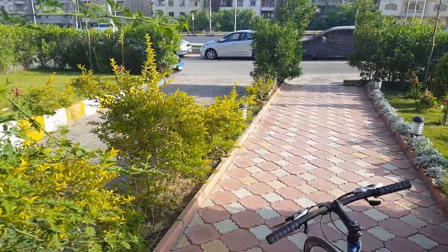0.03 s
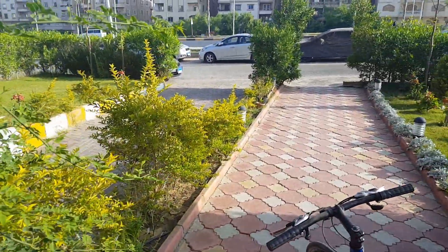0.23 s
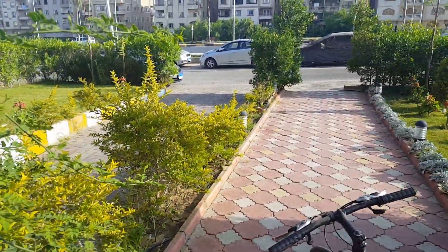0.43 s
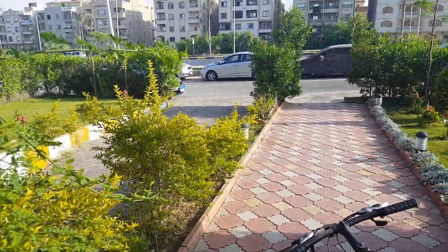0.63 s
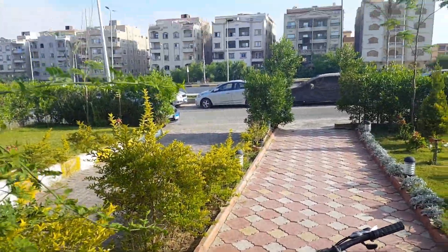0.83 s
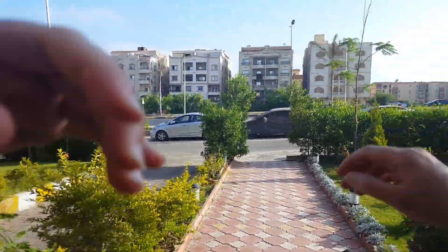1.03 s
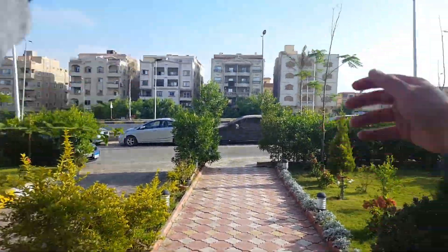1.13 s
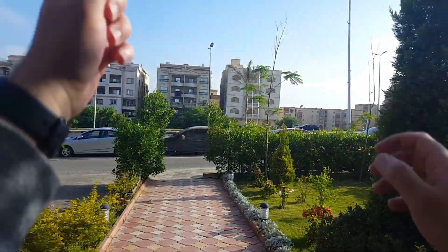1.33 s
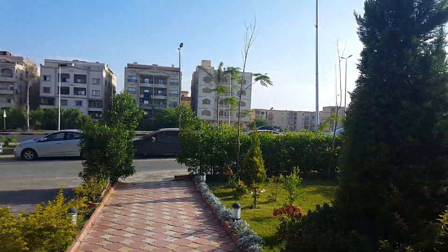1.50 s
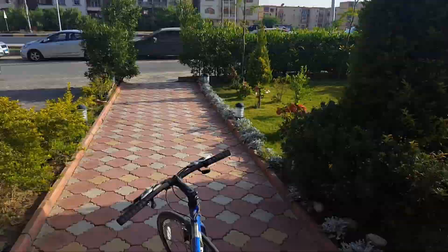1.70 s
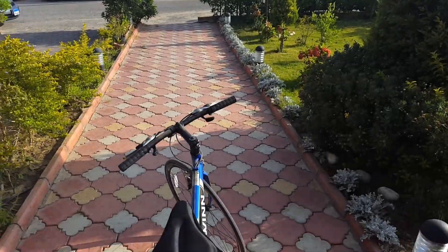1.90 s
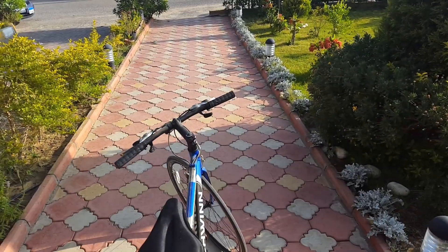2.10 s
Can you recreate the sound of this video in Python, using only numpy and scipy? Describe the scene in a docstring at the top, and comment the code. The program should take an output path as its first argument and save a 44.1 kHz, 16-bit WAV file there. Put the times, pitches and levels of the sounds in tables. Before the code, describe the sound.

A steel gate bangs against its frame close by, its bars ringing and its panels booming. Small metal clinks, two echoing steps on stone and faint rustling cloth come next, while traffic rumbles far away.

```python
"""A heavy steel gate slams in an echoing stone entrance, over distant traffic.
The latch touches at 0.17 s; the leaf hits the frame twice and rattles, ringing its bars.
Its panels boom at the slam and the rebound. From 0.5 s, loose metal parts clink.
Two footsteps follow near 0.85 and 1.25 s, heel then sole, with clothing rustle and low echoes.
A soft swish rises at 1.8 s."""
import sys
import numpy as np
from scipy import signal
from scipy.fft import rfft, irfft
from scipy.io import wavfile

SR = 44100
rng = np.random.default_rng(int(sys.argv[2]) if len(sys.argv) > 2 else 0)


def master(y):
    """Save y as 16-bit WAV."""
    cut = np.clip(np.atleast_2d(y).T, -1, 1)
    pcm = np.round(cut * 32767)  # scale
    wavfile.write(sys.argv[1], SR, pcm.astype(np.int16))


N = 94815
TIME_S = np.arange(N) / SR

# left-right likeness of noise: freq_hz, coherence
COHERENCE = [(170, 0.97), (350, 0.86), (700, 0.02)]
# distant traffic: freq_hz, density_db
TRAFFIC_SPECTRUM = [(22, -51), (49, -0.5), (427, -16), (1050, -14), (16000, -62)]
# gate on latch and frame: start_s, clash_db, clang_db, pan_db, tilt_db_per_octave, bar_hz
GATE_BLOWS = [(0.169, -31.5, -36, 2.5, 1, 950), (0.234, -20, -17, 7, 3, 892),
              (0.264, -19, -18.5, 2, -2.5, 888), (0.2926, -17, -23.5, 0, 1.5, 790),
              (0.4086, -27, -37, -1, -1, 1027), (0.4446, -30, -31.5, 1, 0.5, 877),
              (0.503, -27.5, -26, -4, -4, 732), (0.5289, -25, -27.5, 3, -2.5, 954),
              (0.7411, -41.5, -36, -7, -6, 950)]
# steel on steel: freq_hz, density_db
CLASH_SPECTRUM = [(100, -77), (700, 11), (2000, 8.5), (4000, 3), (5200, 1), (7000, -3), (9200, -9),
                  (10500, -18.5), (15500, -23)]
# frame resonances: freq_hz, half_width_hz, boost_db
FRAME_MODES = [(2050, 37, 4), (3050, 68, 5), (3890, 33, 7.5), (4160, 70, 7), (6900, 140, 5)]
# clang of the bars: freq_hz, density_db
CLANG_SPECTRUM = [(60, -41), (250, 3.5), (600, 1.5), (1300, -12), (2500, -10.5), (12000, -58)]
# entrance reverberation: freq_hz, t60_s
ENTRANCE_DECAY = [(400, 2.66), (1000, 0.46), (5000, 0.89), (15000, 0.73)]
# stone returns less top treble: freq_hz, density_db
ENTRANCE_SPECTRUM = [(3500, 5.5), (8000, 2), (11000, 4.5)]
# panel booms, slam then rebound: start_s, peak_s, noise_db
BOOM_EVENTS = [(0.183, 0.354, -14), (0.489, 0.52, -26)]
# boom noise: freq_hz, density_db, t60_s
BOOM_BANDS = [(25, -24, 1), (60, -8.5, 1.43), (125, -3.5, 6.06), (240, -4.5, 2.4), (339, -4, 1.47),
              (780, -15.5, 0.96), (1980, -29, 1.1), (5900, -66.5, 0.92)]
# panel modes: pitch_hz, slam_db, rebound_db, t60_s
PANEL_MODES = [(136.5, -21, -30, 1.15), (170, -21, -20, 0.97), (213, -18.5, -39, 0.75),
               (296, -23, -35, 1.5), (484, -25, -36.5, 1.3), (629, -25.5, -58, 1.2)]
# loose metal: start_s, level_db, pitch_hz, half_width_hz
CLINK_EVENTS = [(0.529, -30.5, 6550, 347), (0.691, -50, 7900, 3020), (0.923, -41.5, 7000, 150),
                (0.98, -34.5, 4430, 200), (1.004, -43, 7800, 404), (1.025, -41, 5730, 50),
                (1.16, -37.5, 12100, 4900), (1.584, -50, 5795, 220)]
# heel and sole contacts: start_s, tap_db, thud_db, attack_s, knock_hz, knock_db
FOOTFALLS = [(0.838, -27, -29, 0.0018, 855, -36.5), (0.887, -31, -22.5, 0.014, 767, -28),
             (0.94, -59, -28.5, 0.011, 456, -28.5), (1.242, -31, -30.5, 0.0038, 939, -38),
             (1.275, -52, -36.5, 0.0034, 311.5, -32), (1.316, -37, -24.5, 0.017, 828.3, -29),
             (1.4144, -43.5, -29, 0.0066, 857, -42), (1.584, -40.5, -39.5, 0.002, 1000, -43)]
# grit tap and sole thud: freq_hz, tap_density_db, thud_density_db
SHOE_SPECTRA = [(59.3, -16, -13), (307, 9, 8.5), (780, 13, 4.5), (1690, 4.5, -2), (5500, 4.5, -25),
                (10330, -20, -69), (16000, -24, -60)]
# footfall knock: pitch_ratio, level_db
KNOCK_MODES = [(1, 0), (1.57, -7), (1.95, -5), (2.07, -7)]
# clothing rustle, also the clinks' base noise: freq_hz, density_db
RUSTLE_SPECTRUM = [(500, -5), (2000, 6.5), (9000, -5.5), (10500, -20), (13000, -11)]
# rustle before grain: time_s, level_db
RUSTLE_ENVELOPE = [(0.85, -93), (0.98, -36.5), (1.07, -58.5), (1.15, -49.5), (1.3, -57), (1.52, -54.5),
                   (1.68, -72)]
# low echo of each step: start_s, level_db
RUMBLE_EVENTS = [(0.9, -24.5), (1.33, -31)]
# step echo noise: freq_hz, density_db, t60_s
RUMBLE_BANDS = [(30, -7.5, 2.3), (110, 5, 6), (221, 0.5, 2.5), (458, 0.5, 0.84), (1530, -63, 0.82)]
# soft swish: freq_hz, density_db
SWISH_SPECTRUM = [(300, -14), (900, 4.5), (1400, -5.5), (2300, 1), (5300, -6.5), (8800, -23), (10500, -62)]
# swish swell: time_s, level_db
SWISH_ENVELOPE = [(1.8, -61), (1.85, -43.5), (1.99, -39.5), (2.15, -44)]


def amp(db):
    """Decibels to gain."""
    return 10 ** (np.asarray(db) / 20)


def lookup(table, hz, column=1):
    """Table column interpolated over log frequency."""
    columns = np.transpose(table)
    return np.interp(np.log(hz + 1), np.log(columns[0] + 1), columns[column])


def envelope(points):
    """Gain along (time_s, level_db) points; silent before the first."""
    return amp(np.interp(TIME_S, *np.transpose(points))) * (TIME_S > points[0][0])


def add(mix, start_s, sound, pan_db=0):
    """Mix in a stereo sound; positive pan is left."""
    part = mix[:, round(start_s * SR):][:, :sound.shape[1]]
    part += sound[:, :part.shape[1]] * amp([[pan_db / 2], [-pan_db / 2]])


def noise(spectrum, size=N, column=1, bin_gain=1):
    """Unit-RMS stereo noise, nearly mono in the bass."""
    hz = np.fft.rfftfreq(size, 1 / SR)
    coherence = lookup(COHERENCE, hz)
    mid, side = rfft(rng.standard_normal((2, size))) * np.sqrt([1 + coherence, 1 - coherence])
    shape = amp(lookup(spectrum, hz, column)) * bin_gain
    x = irfft(np.array([mid + side, mid - side]) * shape, size)
    return x / np.sqrt(np.mean(x ** 2))


def struck(x, attack_s, t60_s, hold_s=0):
    """Linear attack, hold, exponential decay."""
    t = TIME_S[:x.shape[1]]
    return x * np.minimum(t / attack_s, 1) * amp(-60 * np.maximum(t - attack_s - hold_s, 0) / t60_s)


def band_decay(x, table, start_s=0, column=1):
    """Decay each frequency at its own T60."""
    hz, t, bands = signal.stft(x, SR, nperseg=512)
    decay = amp(-60 * np.maximum(t - start_s, 0) / lookup(table, hz, column)[:, None])
    return signal.istft(bands * decay, SR)[1][:, :x.shape[1]]


def ring(hz, size, attack_s, t60_s):
    """One damped mode, slightly out of phase between channels."""
    phase_turns = rng.random() + rng.standard_normal((2, 1)) * 0.13
    return struck(np.sin(2 * np.pi * (hz * TIME_S[:size] + phase_turns)), attack_s, t60_s)


def traffic():
    """Steady low rumble of distant traffic."""
    return amp(-39.5) * noise(TRAFFIC_SPECTRUM)


def gate_blows(size=32768, spacing_hz=44.02, ripple_db=2.4, clang_attack_s=0.0045):
    """Each blow rings the same steel: bright clash with frame modes, lower clang, one bar."""
    out, hz = np.zeros((2, N)), np.fft.rfftfreq(size, 1 / SR)
    # crowded random resonances
    steel = amp(ripple_db * np.interp(hz / spacing_hz, np.arange(size), rng.standard_normal(size)))
    frame_db = sum(db / (1 + ((hz - mode_hz) / half_width_hz) ** 2)
                   for mode_hz, half_width_hz, db in FRAME_MODES)
    octaves = np.log2(hz + 1)
    for start_s, clash_db, clang_db, pan_db, tilt_db_per_octave, bar_hz in GATE_BLOWS:
        clash = noise(CLASH_SPECTRUM, size, bin_gain=steel * amp(tilt_db_per_octave * octaves + frame_db))
        clash = struck(clash, attack_s=0.00059, t60_s=0.14, hold_s=0.0016)
        clang = struck(noise(CLANG_SPECTRUM, size, bin_gain=steel), clang_attack_s, t60_s=0.29)
        bar = amp(-5.5) * ring(bar_hz, size, clang_attack_s, t60_s=0.33)
        add(out, start_s, amp(clash_db) * clash, pan_db)
        add(out, start_s, amp(clang_db) * (clang + bar))
    return out


def entrance_echo(x, rise_s=0.02):
    """Diffuse echo off stone, longest in the bass."""
    tail = band_decay(noise(ENTRANCE_SPECTRUM), ENTRANCE_DECAY) * np.minimum(TIME_S / rise_s, 1)
    return signal.fftconvolve(x, tail / np.linalg.norm(tail[0]), axes=1)[:, :N]


def panel_boom():
    """Panels and entrance air build up, then ring out; the rebound favours the lower modes."""
    out = np.zeros((2, N))
    for event, (start_s, peak_s, noise_db) in enumerate(BOOM_EVENTS):
        swell = np.clip((TIME_S - start_s) / (peak_s - start_s), 0, 1) ** 0.71
        since_peak_s = np.maximum(TIME_S - peak_s, 0)
        boom = amp(noise_db) * band_decay(noise(BOOM_BANDS), BOOM_BANDS, peak_s, column=2)
        for hz, slam_db, rebound_db, t60_s in PANEL_MODES:
            mode_db = (slam_db, rebound_db)[event] - 60 * since_peak_s / t60_s
            phase_turns = rng.random() + rng.standard_normal((2, 1)) * hz / 4000
            boom += amp(mode_db) * np.sin(2 * np.pi * (hz * TIME_S + phase_turns))
        out += swell * boom
    return out


def clinks(size=4096):
    """Loose metal parts tick or ring briefly, to the left."""
    out, hz = np.zeros((2, N)), np.fft.rfftfreq(size, 1 / SR)
    for start_s, level_db, pitch_hz, half_width_hz in CLINK_EVENTS:
        resonance = 1 / (1 + ((hz - pitch_hz) / half_width_hz) ** 2)
        clink = struck(noise(RUSTLE_SPECTRUM, size, bin_gain=resonance), attack_s=0.0012, t60_s=0.047)
        add(out, start_s, amp(level_db) * clink, pan_db=3)
    return out


def footsteps(size=16384):
    """The heel taps gritty stone; the sole lands with a ringing knock."""
    out = np.zeros((2, N))
    for start_s, tap_db, thud_db, attack_s, knock_hz, knock_db in FOOTFALLS:
        tap = amp(tap_db) * struck(noise(SHOE_SPECTRA, size), attack_s, t60_s=0.099)
        thud = amp(thud_db) * struck(noise(SHOE_SPECTRA, size, column=2), attack_s, t60_s=0.26)
        knock = sum(amp(knock_db + db) * ring(knock_hz * ratio, size, attack_s, t60_s=0.13)
                    for ratio, db in KNOCK_MODES)
        add(out, start_s, tap + thud + knock, pan_db=-0.5)
    return from_right(out)


def from_right(x, lag_s=0.000377):
    """The direct share of the sound reaches the left channel later."""
    hz = np.fft.rfftfreq(N, 1 / SR)
    left, right = rfft(x)
    direct = 0.35 * (1 - lookup(COHERENCE, hz))
    delayed = right * np.exp(-2j * np.pi * hz * lag_s)
    left = np.sqrt(1 - direct ** 2) * left + direct * delayed
    return irfft(np.array([left, right]), N)


def clothing_rustle(grain_db=3.56):
    """Cloth noise with a fast random flutter in level."""
    knots_s = TIME_S[::128]
    grain = amp(grain_db * np.interp(TIME_S, knots_s, rng.standard_normal(len(knots_s))))
    return envelope(RUSTLE_ENVELOPE) * grain * noise(RUSTLE_SPECTRUM)


def step_echoes(rise_s=0.067):
    """The entrance answers each step with a hollow rumble that darkens as it fades."""
    out = np.zeros((2, N))
    for start_s, level_db in RUMBLE_EVENTS:
        rumble = band_decay(noise(RUMBLE_BANDS), RUMBLE_BANDS, rise_s, column=2)
        add(out, start_s, amp(level_db) * np.minimum(TIME_S / rise_s, 1) * rumble)
    return out


def swish():
    """Soft swell of midrange noise."""
    return envelope(SWISH_ENVELOPE) * noise(SWISH_SPECTRUM)


def scene():
    """Sum of all layers; blows and steps feed the entrance echo."""
    gate, steps = gate_blows(), footsteps()
    echo = entrance_echo(amp(-11) * gate + amp(-8) * steps)
    foreground = gate + echo + clinks() + panel_boom() + steps + step_echoes()
    return foreground + traffic() + clothing_rustle() + swish()


def record(dry, cutoff_hz=16100):
    """Treble leans right near 5.5 kHz and left near 8.5 kHz; then a low-pass."""
    hz = np.fft.rfftfreq(N, 1 / SR)
    pan_db = lookup([(3500, 0), (5500, -4.0), (8500, 6.5), (13000, -1)], hz)
    panned = irfft(rfft(dry) * amp([pan_db / 2, -pan_db / 2]), N)
    lowpass = signal.firwin(401, cutoff_hz, window=("kaiser", 9), fs=SR)
    return signal.oaconvolve(panned, lowpass[None], "same")


dry = scene()
out = record(dry)
master(out)
```